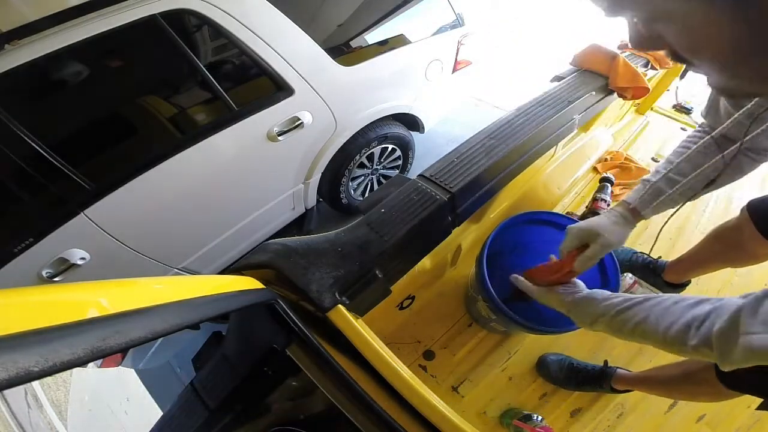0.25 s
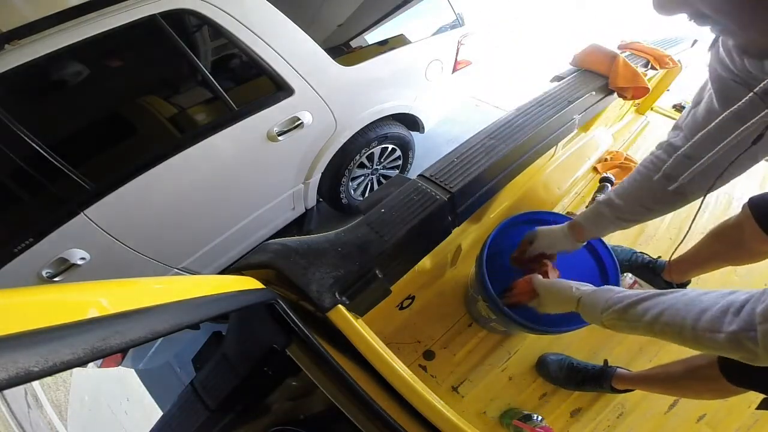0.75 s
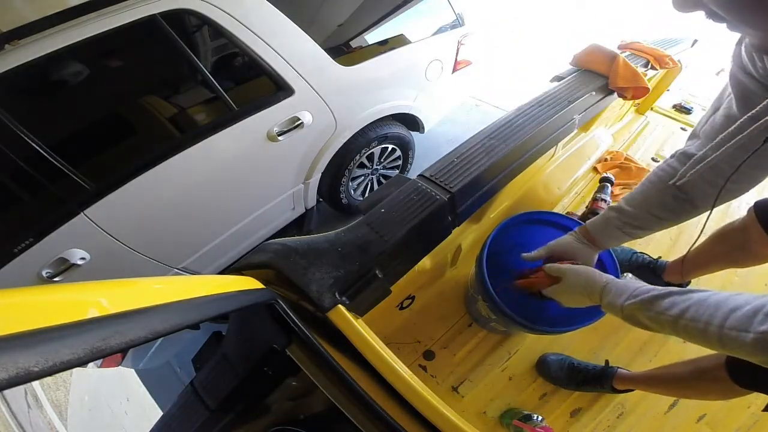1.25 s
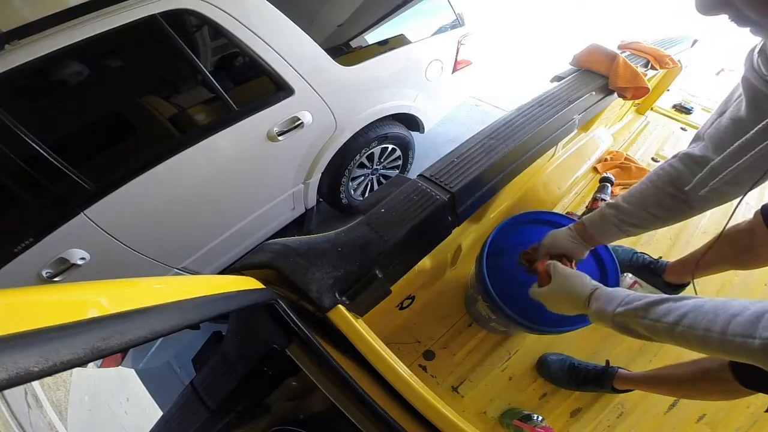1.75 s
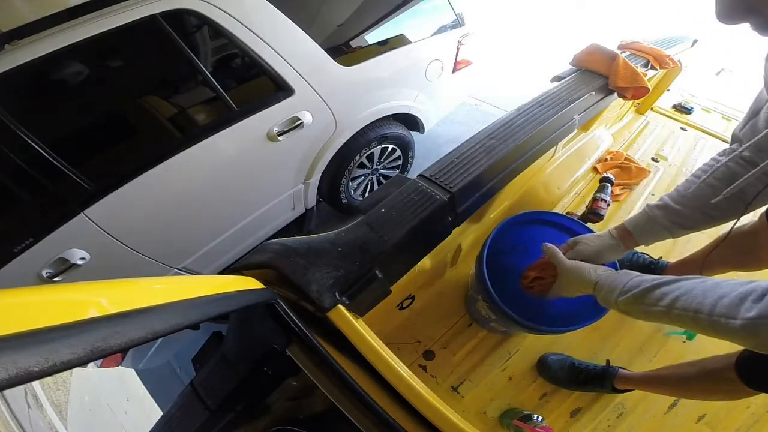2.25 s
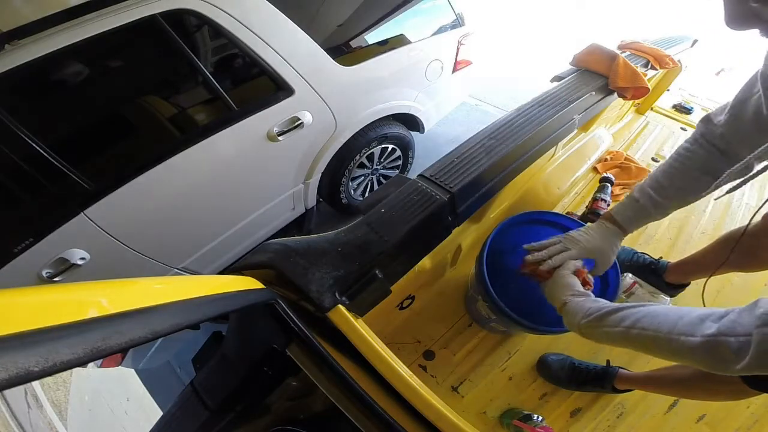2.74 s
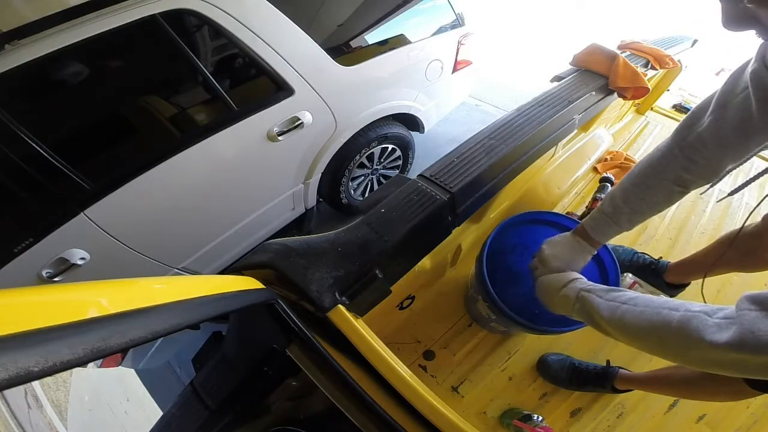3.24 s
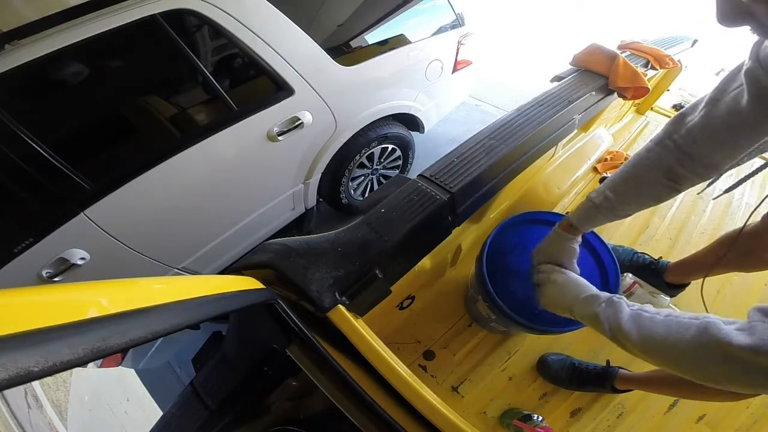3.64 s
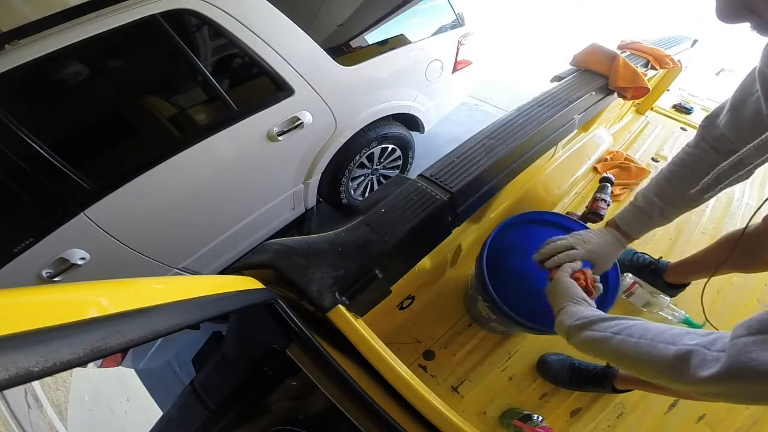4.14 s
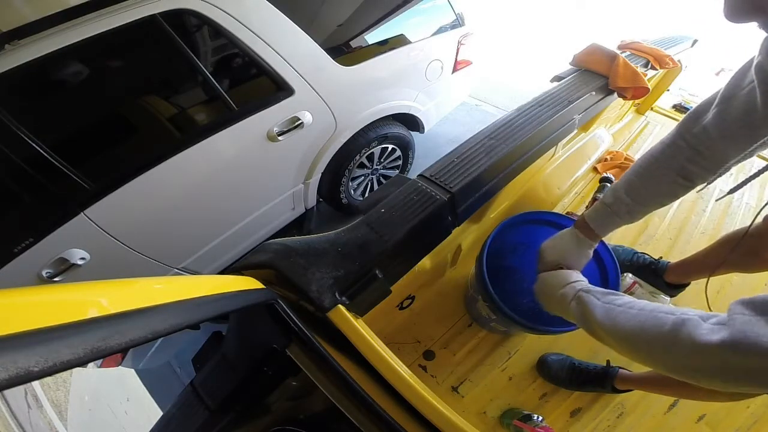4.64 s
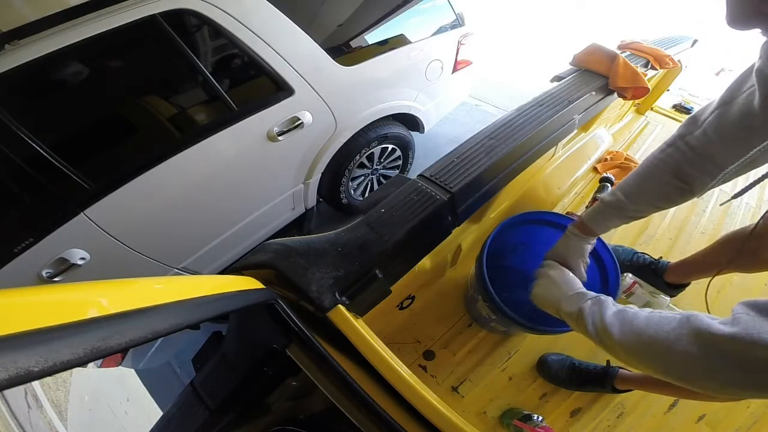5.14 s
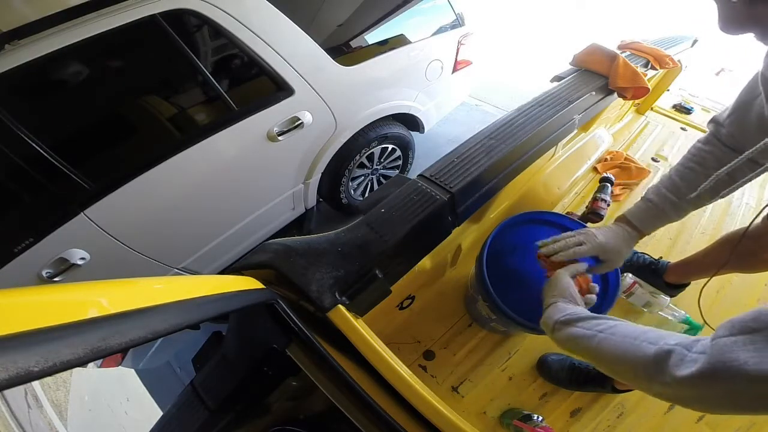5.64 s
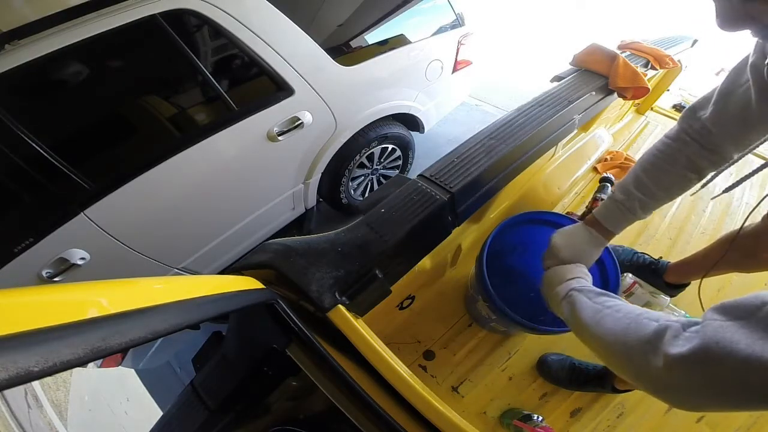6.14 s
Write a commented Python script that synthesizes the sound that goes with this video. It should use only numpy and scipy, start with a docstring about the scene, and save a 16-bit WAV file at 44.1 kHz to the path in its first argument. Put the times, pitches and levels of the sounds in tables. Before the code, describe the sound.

A wet towel is sloshed and wrung over a plastic bucket, with glugging bubbles, spattering drops and dull knocks, between parked cars with a distant engine.

```python
"""Between two parked cars, a wet towel is rinsed and wrung over a plastic bucket.
Air pockets glug as rising, dying sines; drops, slaps and spray are short tones and bursts of noise.
Swarms of small bubbles and hiss make the churn, and resonances of the bucket's air colour the water.
Dull knocks and dry rubs join in, and the cars and walls return a short, dulled tail.
Farther off, two sines make an engine that changes speed, under a hush of shaped noise."""
import sys
import numpy as np
from scipy import signal
from scipy.fft import rfft, irfft
from scipy.io import wavfile
from scipy.ndimage import uniform_filter1d

SR = 44100
rng = np.random.default_rng(int(sys.argv[2]) if len(sys.argv) > 2 else 0)


def wav_out(sig):
    """Save sig, one row per channel (or a flat mono array), as 16-bit PCM at SR to the path in sys.argv[1]."""
    wavfile.write(sys.argv[1], SR, np.round(np.clip(np.atleast_2d(sig).T, -1, 1) * 32767).astype(np.int16))


N = 281799   # length in samples

# Spectrum of water trickling off the towel. Each row: frequency in Hz, relative density in dB per Hz.
TRICKLE_SPECTRUM = [(1300, -8), (1600, -13.5), (2120, 5.5), (2970, 3), (3300, 8.5), (3910, -36),
                    (5200, -16)]
# Spectrum of fizz and fine spray. Each row: frequency in Hz, relative density in dB per Hz.
FIZZ_SPECTRUM = [(3000, -1), (3800, 0), (4720, -3.5), (5400, -2), (6250, -4.5), (8580, -15), (9420, -25.5),
                 (12300, -24), (14000, -70), (15400, -50)]

HUSH_DB = -57   # rms of the part above 130 Hz
YARD_T60_S, YARD_DB = 0.31, -12.5   # decay of the reflections; their level against the water
CUTOFF_HZ = 15600
THIN_HZ, THIN_WAVER_HZ = 2880, 6.6   # centre; spread of the pitch
RUB_RISE_DB_PER_S, RUB_FALL_DB_PER_S = 210, 140
KNOCK_HZ, KNOCK_T60_S = 142, 0.056
HOLLOW_WIDTH_HZ = 36   # of each of two resonances in a row
HOLLOW_RISE_DB_PER_S, HOLLOW_FALL_DB_PER_S = 400, 110
SLAP_T60_S, SLAP_TOP_HZ = 0.086, 2500
FIZZ_DB, FIZZ_FOLLOWS = -54, 0.8   # setting at a trickle of -50 dB; share of the trickle's swing in dB
SURGE_RISE_DB_PER_S, SURGE_FALL_DB_PER_S = 173, 102
HEAVE_REST_DB = -61.5   # the water's mass between surges
SNAP_T60_S = 0.032   # crack
SNAP_TAIL_T60_S, SNAP_TAIL_DB = 0.33, -10   # mist settling; its start against the crack
SNAP_WIDTH_HZ, SNAP_AIR_DB = 1150, -17   # coloured band; broad hiss against it
SNAP_BELOW_PEAK_DB = -8.5   # mean level of the crack's coloured band against the listed peak
SPLASH_DB = -9.5   # broad splash around each drop, against its peak setting
GULP_T60_S, GULP_RISE_OCT = 0.056, 2
TEAR_HZ, GLUG_ROUGH = 190, 0.24   # how fast a ragged pocket flutters; share of flutter 0-1
GLUG_T60_S, GLUG_RISE_OCT = 0.069, 0.1   # ring of a pocket at 800 Hz; every pocket climbs a little
GLUG_LONGER = 0.54   # large, low pockets ring longer: t60 goes with pitch to minus this power


def from_db(db):
    """Decibels to gain."""
    return 10 ** (np.asarray(db) / 20)


def rms_one(x):
    """Scale to unit power."""
    return x / np.sqrt(np.mean(x ** 2) + 1e-20)


def in_time(rows):
    """Columns of a curve table, one value a sample."""
    s, *columns = np.transpose(rows)
    return [np.interp(np.arange(N) / SR, s, column) for column in columns]


def at_hz(points, hz):
    """Read a spectrum on a log-frequency axis."""
    points = np.array(points)
    return np.interp(np.log(hz), np.log(points[:, 0]), points[:, 1])


def drift(rate_hz):
    """Slow chance with spread 1: low-passed noise drawn every 40 samples."""
    r = np.exp(-80 * np.pi * rate_hz / SR)
    steps = rng.standard_normal(N // 40 + 2002)
    slow = signal.lfilter([1], [1, -2 * r, r * r], steps)[2000:]   # skip the filter's start
    return np.interp(np.arange(N) / 40, np.arange(len(slow)), rms_one(slow))


def shaped_noise(spectrum):
    """White noise given a spectrum, silent outside it."""
    hz = np.fft.rfftfreq(N, 1 / SR) + 1
    inside = (hz > spectrum[0][0]) & (hz < spectrum[-1][0])
    white = rfft(rng.standard_normal(N))
    return irfft(white * from_db(at_hz(spectrum, hz)) * inside, N)


def band_pass(x, low_hz, high_hz, order):
    """Keep the band between two frequencies."""
    sos = signal.butter(order, [low_hz, high_hz], "band", fs=SR, output="sos")
    return signal.sosfilt(sos, x)


def resonance(x, hz, width_hz):
    """Two-pole peak with gain close to 1 on top."""
    r = np.exp(-np.pi * width_hz / SR)
    zeros = np.array([1, 0, -1]) * (1 - r * r) / 2
    poles = [1, -2 * r * np.cos(2 * np.pi * hz / SR), r * r]
    return signal.lfilter(zeros, poles, x)


def narrow_noise(hz, width_hz):
    """Noise twice through one resonance; rms 1."""
    once = resonance(rng.standard_normal(N), hz, width_hz)
    return rms_one(resonance(once, hz, width_hz))


def add(out, s, sound):
    """Mix a short sound in at a time."""
    i = int(s * SR)
    out[i:i + len(sound)] += sound[:N - i]


def swells(s, peak_db, rise_db_per_s, fall_db_per_s):
    """Gain that climbs to each peak and falls away from it."""
    since = np.arange(N) / SR - np.array(s)[:, None]
    slope_db = np.minimum(rise_db_per_s * since, -fall_db_per_s * since)
    return from_db(np.array(peak_db)[:, None] + slope_db).sum(axis=0)


def bubble(hz, t60, rise_oct, attack_s):
    """A dying sine; its pitch climbs through the first half as the bubble nears the surface."""
    t60 = np.clip(t60, .008, .5)
    t = np.arange(int(t60 * SR)) / SR
    pitch_hz = hz * 2 ** (rise_oct * np.minimum(2 * t / t60, 1))
    phase = 2 * np.pi * np.cumsum(pitch_hz) / SR
    return np.sin(phase) * from_db(-60 * t / t60) * (1 - np.exp(-t / attack_s))


def swarm(spectrum, per_s, cycles, spread_db, clump_db, count):
    """Random small bubbles in clumps, dealt over the pitches of a spectrum; rms 1."""
    pitches = np.geomspace(spectrum[0][0], spectrum[-1][0], count)
    clumps = from_db(clump_db * drift(13))
    at = np.nonzero(rng.random(N) < per_s * clumps / SR)[0]
    sizes = from_db(spread_db * np.minimum(rng.exponential(1, N), 3)) * rng.choice([-1, 1], N)
    dealt, out = rng.integers(0, count, N), 0
    for k, hz in enumerate(pitches):
        clicks = np.full(N, 1e-18)
        mine = at[dealt[at] == k]
        clicks[mine] = sizes[mine]
        ring = bubble(hz, cycles / hz, rise_oct=0.402, attack_s=0.15 / hz) * hz
        out = out + from_db(at_hz(spectrum, hz)) * signal.fftconvolve(clicks, ring)[:N]
    slow = np.sqrt(uniform_filter1d(out ** 2, int(.2 * SR)) + 1e-12)
    return rms_one(out / slow)   # even out the slow level; the churn sets it


def patter(per_s, spread_db, decay_s):
    """Level of many small drops landing at random: each jumps up and dies quickly; rms 1."""
    sizes = from_db(spread_db * np.minimum(rng.exponential(1, N), 3))
    drops = (rng.random(N) < per_s / SR) * sizes
    r = np.exp(-1 / (decay_s * SR))
    dying = signal.lfilter([1], [1, -r], drops + 1e-18)
    return rms_one(signal.lfilter([.05], [1, -.95], dying))   # soften each onset


def hush():
    """Steady outdoor air and far traffic: shaped noise, levelled by its part above the rumble."""
    # Each row: frequency in Hz, relative density in dB per Hz.
    air_spectrum = [(12, -35), (20, -1), (106, 3.7), (129, -4.5), (152, 1), (213, -6.5), (665, -18),
                    (1010, -19.5), (1530, -21.5), (2990, -28.5), (3940, -29.5), (7500, -25.5),
                    (8000, -31.5), (12300, -39), (13400, -45), (15400, -39)]
    air = shaped_noise(air_spectrum)
    above = signal.sosfilt(signal.butter(4, 130, "high", fs=SR, output="sos"), air)
    return from_db(HUSH_DB + 0.5 * drift(0.92)) * air / np.std(above)


def engine():
    """Two low orders of the firing cycle carry this far; their levels waver."""
    # Engine speed. Each row: time in seconds, cycle rate in Hz.
    engine_speed = [(0, 17.5), (1.6, 17.5), (1.85, 18.6), (2.05, 20.6), (2.25, 22.1), (2.7, 21.6),
                    (3.2, 20.9), (3.6, 21.2), (6.39, 21)]
    # Loudness before the waver. Each row: time in seconds, rms of the fifth and fourth orders in dB.
    order_levels = [(0, -59.5, -52), (1.5, -56, -57), (1.85, -47.5, -53.5), (2.3, -53.5, -49.5),
                    (2.8, -53.5, -55.5), (3.2, -51, -51.5), (3.8, -51, -75), (5, -51, -53),
                    (6.39, -52, -68)]
    fifth_db, fourth_db = in_time(order_levels)
    turn = 2 * np.pi * np.cumsum(in_time(engine_speed)[0]) / SR
    fifth = from_db(fifth_db + 1.6 * drift(5)) * np.sin(turn * 5)
    fourth = from_db(fourth_db + 1.5 * drift(4)) * np.sin(turn * 4)
    return np.sqrt(2) * (fifth + fourth)   # sines of rms 1


def yard(x):
    """Reflections from car sides and walls: a dense, dulled, dying tail."""
    t = np.arange(int(.5 * SR)) / SR
    tail = rng.standard_normal(len(t)) * from_db(-60 * t / YARD_T60_S) * (t > .006)
    tail = signal.lfilter([.45], [1, -.55], tail)
    return signal.fftconvolve(x, tail / np.sqrt(np.sum(tail ** 2)))[:N]


def thin_tone():
    """A faint, narrow, slightly wavering tone that fades in and out."""
    # Each row: time in seconds, rms level in dB.
    tone_fade = [(5.6, -88), (5.64, -69), (5.84, -70), (5.9, -88)]
    level_db, = in_time(tone_fade)
    phase = 2 * np.pi * np.cumsum(THIN_HZ + THIN_WAVER_HZ * drift(9.8)) / SR
    return np.sqrt(2) * from_db(level_db) * np.sin(phase)


def rub():
    """Dry rubs of cloth and gloves: grainy friction noise in the trickle's colour."""
    # Each row: hardest grip in seconds, level there in dB.
    grips = [(4.3, -53.5), (5.85, -66), (6.01, -68), (6.07, -56), (6.15, -65)]
    grain = 0.5 + 0.72 * patter(per_s=120, spread_db=-1.0, decay_s=0.0068)
    friction = rms_one(grain * shaped_noise(TRICKLE_SPECTRUM))
    return swells(*np.transpose(grips), RUB_RISE_DB_PER_S, RUB_FALL_DB_PER_S) * friction


def knocks():
    """Dull knocks on the bucket wall: a low, short thud at a steady pitch."""
    # Each row: start in seconds, level in dB.
    wall_hits = [(0.159, -38), (3.342, -27.5)]
    out = np.zeros(N)
    for s, peak_db in wall_hits:
        add(out, s, from_db(peak_db) * bubble(KNOCK_HZ, KNOCK_T60_S, 0, attack_s=0.0027))
    return out


def hollow():
    """The settling water keeps a low air mode sounding, at a pitch that shifts from swell to swell."""
    # Each row: peak in seconds, level in dB, pitch in Hz.
    hum_swells = [(2.46, -42, 483), (2.602, -43.5, 571), (2.72, -55, 579), (2.85, -52.5, 525),
                  (2.92, -52.5, 445)]
    out = np.zeros(N)
    for s, db, hz in hum_swells:
        gain = swells([s], [db], HOLLOW_RISE_DB_PER_S, HOLLOW_FALL_DB_PER_S)
        out += gain * narrow_noise(hz, HOLLOW_WIDTH_HZ)
    return out


def slaps():
    """Cloth or hand lands flat on the water: a short burst of noise without deep bass or treble."""
    # Each row: start in seconds, level in dB.
    flat_hits = [(0.188, -32.5), (0.426, -30), (1.217, -44), (1.252, -35), (1.873, -33), (2.6, -43),
                 (6.295, -45.5)]
    out = np.zeros(N)
    bursts = rng.standard_normal((len(flat_hits), int(.1 * SR)))
    bursts = band_pass(bursts, 300, SLAP_TOP_HZ, order=2)
    fade = from_db(-60 * np.arange(bursts.shape[1]) / SR / SLAP_T60_S)
    for (s, peak_db), burst in zip(flat_hits, bursts):
        add(out, s, from_db(peak_db) * fade * rms_one(burst))
    return out


def air_modes(x):
    """The resonances of the air above the water, summed with alternating sign."""
    # Each row: frequency in Hz, width in Hz, gain in dB.
    modes = [(393, 37, -5), (591, 17, -11.5), (775, 67, -10.5), (979, 48, -4.5), (1220, 320, -8.5),
             (1940, 73, -3), (2500, 27, -4), (3280, 50, -35)]
    return sum((-1) ** k * from_db(db) * resonance(x, hz, width_hz)
               for k, (hz, width_hz, db) in enumerate(modes))


def spatter(noise):
    """Fine drops differ in size, so each part of the treble patters on its own."""
    edges = np.geomspace(3000, 15000, 5)
    return sum(patter(per_s=78, spread_db=6.0, decay_s=0.011) * band_pass(noise, low, high, order=2)
               for low, high in zip(edges, edges[1:]))


def churn():
    """Slosh of large bubbles, trickle of small ones and fizz, each over wet hiss; the mass heaves below."""
    # Large bubbles. Each row: frequency in Hz, relative density in dB per Hz.
    slosh_spectrum = [(230, -40), (393, -10), (560, 1), (765, 2.5), (1100, -3.5), (1470, -19), (1900, -7)]
    # How hard the water is stirred. Each row: time in seconds, slosh setting in dB.
    stirring = [(0, -33.5), (.12, -53), (.8, -43.5), (1.16, -46), (1.55, -52), (1.72, -48.5), (2.01, -49.5),
                (2.15, -56.5), (2.3, -52.5), (2.6, -49.5), (3.02, -53.5), (3.22, -46), (3.72, -40.5),
                (3.95, -53), (4.57, -56.5), (4.75, -44.5), (5.15, -45.5), (5.39, -53), (5.55, -58.5),
                (6.39, -53.5)]
    # Water running off the towel. Each row: time in seconds, trickle setting in dB.
    towel_runoff = [(0, -48), (.3, -52.5), (.55, -53.5), (.65, -46), (.98, -49.5), (1.24, -55.5),
                    (1.6, -55.5), (1.72, -48), (2.01, -50.5), (2.15, -60), (2.26, -53), (2.42, -55),
                    (2.74, -67), (3.02, -57.5), (3.14, -42.5), (3.72, -45), (3.95, -61.5), (4.09, -71),
                    (4.56, -67.5), (4.68, -42.5), (5.15, -45), (5.55, -70), (6.39, -66.5)]
    # A mass of water thrown about or squeezed out at once.
    # Each row: peak in seconds, added slosh in dB, added fizz in dB, added heave in dB.
    surges = [(.19, -42.5, -93, -42), (.44, -46, -53.5, -62), (0.901, -37, -84, -40), (1.24, -74, -63, -50),
              (1.93, -37.5, -55.5, -45.5), (2.33, -41, -60, -64), (3.24, -46, -44.5, -55),
              (3.35, -38, -83, -44), (3.52, -51, -78, -42), (4.81, -44, -54, -57), (5.061, -37, -70, -41.5)]
    (slosh_db,), (trickle_db,) = in_time(stirring), in_time(towel_runoff)
    fizz_db = FIZZ_DB + FIZZ_FOLLOWS * (trickle_db + 50)
    s, *peaks = np.transpose(surges)
    slosh_up, fizz_up, heave_up = [
        swells(s, db, SURGE_RISE_DB_PER_S, SURGE_FALL_DB_PER_S) for db in peaks]

    slosh = swarm(slosh_spectrum, per_s=450, cycles=47.5, spread_db=4.5, clump_db=2.5, count=24)
    trickle = swarm(TRICKLE_SPECTRUM, per_s=400, cycles=47, spread_db=3.0, clump_db=6.0, count=18)
    fizz_clump_db = 6 * np.clip((trickle_db + 64) / 15, .2, 1)
    fizz = swarm(FIZZ_SPECTRUM, per_s=1500, cycles=20, spread_db=0.5, clump_db=fizz_clump_db, count=16)

    bubbly = np.clip((slosh_db + 57.5) / 10.6, .15, 1)   # calm water traps little air
    wash = rms_one(air_modes(shaped_noise(slosh_spectrum)))   # moving water keeps the air humming
    wash_gain = 0.39 * from_db(4.96 * bubbly * drift(10.6))
    drops = patter(per_s=50, spread_db=5.5, decay_s=0.006)
    hiss = rms_one(shaped_noise(TRICKLE_SPECTRUM))
    mist = rms_one(shaped_noise(FIZZ_SPECTRUM))
    heave = resonance(rng.standard_normal(N), hz=150, width_hz=640)
    heave = rms_one(resonance(heave, hz=141, width_hz=140))

    stirred = (from_db(slosh_db) + slosh_up) * (bubbly * slosh + wash_gain * wash)
    running = from_db(trickle_db) * (trickle + (0.12 + 0.99 * drops) * hiss)
    fizzing = fizz + (0.051 + 0.44 * drops) * mist + 1.08 * spatter(mist)
    fizzing = (from_db(fizz_db) + fizz_up) * fizzing
    return stirred + running + fizzing + (from_db(HEAVE_REST_DB) + heave_up) * heave


def snaps():
    """A sheet of water bursts into spray: a coloured treble band over broad hiss, with a softer tail."""
    # Each row: start in seconds, peak setting in dB, strongest frequency in Hz.
    bursting_sheets = [(0.3681, -38, 6010), (0.6494, -34, 6200), (1.2552, -37.5, 6900),
                       (1.4154, -43.5, 5730), (1.7673, -37.5, 7090), (1.799, -38, 5540),
                       (1.867, -30.5, 5010), (2.1824, -39, 5730), (2.3025, -33, 5400), (2.322, -31.5, 8800),
                       (2.9118, -46, 5740), (3.1276, -34, 5230), (3.1842, -33, 5340), (3.231, -26, 6030),
                       (3.396, -36, 5530), (3.5694, -37, 5100), (3.7908, -36.5, 7120), (3.843, -33.5, 5680),
                       (4.5977, -40, 6030), (4.891, -43, 5580), (5.2889, -40, 5610)]
    out = np.zeros(N)
    bursts = rng.standard_normal((len(bursting_sheets), int(.2 * SR)))
    t = np.arange(bursts.shape[1]) / SR
    fade = from_db(-60 * t / SNAP_T60_S) + from_db(SNAP_TAIL_DB - 60 * t / SNAP_TAIL_T60_S)
    airs = band_pass(bursts, 5000, 13300, order=3)
    for (s, peak_db, hz), air in zip(bursting_sheets, airs):
        coloured = rms_one(resonance(air, hz, SNAP_WIDTH_HZ))
        burst = coloured + from_db(SNAP_AIR_DB) * rms_one(air)
        add(out, s, from_db(peak_db + SNAP_BELOW_PEAK_DB) * fade * burst)
    return out


def splats():
    """Each drop: a small bubble in noise around its pitch, a broad splash, and fine spray above."""
    # Drops hitting the surface. Each row: start in seconds, peak setting in dB, bubble pitch in Hz,
    # bubble t60 in seconds, spray setting in dB.
    falling_drops = [(0.1852, -22, 2150, 0.018, -56), (0.3336, -35, 3140, 0.15, -57),
                     (0.4249, -33.5, 1986, 0.17, -39), (0.5662, -33, 2190, 0.033, -58),
                     (0.637, -31.5, 3360, 0.065, -42.5), (0.6783, -26.5, 3070, 0.089, -57),
                     (0.99, -28, 3400, 0.066, -59), (1.0788, -26.5, 5000, 0.027, -19.5),
                     (1.2189, -29, 2860, 0.019, -56), (1.4705, -35.5, 2184, 0.077, -62),
                     (1.621, -34, 1960, 0.026, -59), (1.6432, -27, 1790, 0.036, -64),
                     (1.6675, -28, 2150, 0.032, -56), (1.705, -27, 3520, 0.022, -36),
                     (1.732, -28.5, 2920, 0.049, -60), (1.803, -33, 2780, 0.034, -44),
                     (1.9032, -30.5, 3070, 0.069, -35.5), (2.2045, -30.5, 3350, 0.017, -60),
                     (2.2302, -34, 3200, 0.11, -46.5), (2.3032, -30.5, 3270, 0.094, -57),
                     (2.32, -31, 3270, 0.047, -35.5), (2.383, -32, 2590, 0.043, -37),
                     (2.483, -39.5, 3450, 0.091, -69), (2.517, -29, 3310, 0.043, -42),
                     (2.745, -42.5, 5650, 0.046, -57), (2.9116, -32.5, 5640, 0.054, -36.5),
                     (3.0624, -27, 2030, 0.035, -36), (3.085, -23.5, 1950, 0.022, -64),
                     (3.132, -24.5, 2660, 0.069, -30), (3.232, -31, 3320, 0.038, -43),
                     (3.2963, -17.5, 2550, 0.021, -53), (3.3207, -27.5, 2980, 0.069, -66),
                     (3.3414, -25.5, 2450, 0.039, -54), (3.3728, -30, 2390, 0.053, -41),
                     (3.4013, -24, 3160, 0.047, -28.5), (3.436, -20, 3280, 0.029, -26.5),
                     (3.505, -19.5, 3210, 0.047, -61), (3.532, -20.5, 3120, 0.028, -31.5),
                     (3.5776, -31.5, 2140, 0.12, -40.5), (3.647, -27, 3720, 0.027, -40),
                     (3.7005, -25, 2164, 0.044, -41), (3.745, -31, 2480, 0.041, -55),
                     (3.7797, -40.5, 2230, 0.14, -54), (4.1012, -37.5, 2075, 0.044, -51),
                     (4.629, -35.5, 3280, 0.087, -47), (4.649, -33, 2500, 0.035, -49),
                     (4.6683, -34, 3520, 0.041, -29), (4.724, -22.5, 2440, 0.034, -30),
                     (4.749, -26, 3330, 0.031, -50), (4.7775, -32, 3400, 0.063, -53),
                     (4.793, -26, 3380, 0.036, -37), (4.8177, -29, 2060, 0.047, -43),
                     (4.8375, -21, 3280, 0.032, -52), (4.9145, -44, 3280, 0.049, -33),
                     (4.9404, -26.5, 1800, 0.052, -53), (4.956, -26.5, 1810, 0.04, -45),
                     (5.007, -34, 3460, 0.059, -37), (5.065, -28, 3280, 0.075, -45),
                     (5.0865, -35, 3420, 0.093, -32.5), (5.1254, -23.5, 3280, 0.027, -37),
                     (5.171, -19, 2450, 0.042, -24), (5.244, -30, 2980, 0.04, -39.5),
                     (5.2595, -22, 2530, 0.02, -34), (5.278, -29, 2860, 0.056, -43),
                     (5.495, -48, 5400, 0.034, -46), (5.604, -55, 3500, 0.03, -51),
                     (6.296, -50, 2500, 0.12, -48.5), (6.38, -45, 3300, 0.043, -44)]
    out, splash_gate = np.zeros((2, N))
    mist = rms_one(shaped_noise(FIZZ_SPECTRUM))
    tints_hz = rng.uniform(3700, 7400, len(falling_drops))   # every spray has its own colour
    puffs = rng.standard_normal((len(falling_drops), int(.12 * SR)))
    t = np.arange(puffs.shape[1]) / SR
    for (s, peak_db, hz, t60, spray_db), puff, tint_hz in zip(falling_drops, puffs, tints_hz):
        dying = from_db(-60 * t / np.clip(t60, .01, .2))
        fade = dying * (1 - np.exp(-t / 0.0034))
        add(out, s, from_db(peak_db - 2.0) * bubble(hz, t60, rise_oct=0.183, attack_s=0.00031))
        add(out, s, from_db(peak_db - 1.5) * fade * rms_one(resonance(puff, hz, width_hz=246)))
        add(splash_gate, s, from_db(peak_db + SPLASH_DB) * dying)
        spray = np.roll(mist, -int(s * SR))[:len(t)]
        spray = resonance(resonance(spray, tint_hz, width_hz=2400), tint_hz, width_hz=3800)
        add(out, s, from_db(spray_db + 9.5) * fade * spray)
    return out + splash_gate * rms_one(shaped_noise(TRICKLE_SPECTRUM))


def gulps():
    """Water folds over a hollow, which closes quickly, so its pitch sweeps up."""
    # Each row: start in seconds, level in dB, starting pitch in Hz.
    folds = [(.474, -26, 400), (0.705, -17.5, 475), (0.882, -23, 312), (1.873, -24, 333),
             (1.889, -19.5, 335), (1.913, -18.5, 361), (2.003, -27.5, 303), (2.212, -36, 960),
             (5.003, -14, 335), (5.047, -21, 380)]
    out = np.zeros(N)
    for s, peak_db, hz in folds:
        add(out, s, from_db(peak_db) * bubble(hz, GULP_T60_S, GULP_RISE_OCT, attack_s=0.0045))
    return out


def glugs():
    """Each closing air pocket rings at its own pitch and flutters, which widens it into a band."""
    # Each row: start in seconds, strength in dB, starting pitch in Hz, attack in ms.
    pockets = [(0.022, -23, 710, 4), (0.058, -19.5, 1006, 1.8), (0.062, -24, 752, 2.6),
               (0.141, -20, 890, 2.8), (0.187, -19.5, 930, 1.2), (0.322, -29, 980, 1),
               (0.388, -14, 1037, 2.3), (0.426, -22, 1016, 0.66), (0.436, -22, 701, 2.9),
               (0.479, -13.5, 797, 11), (0.555, -29, 598, 8.9), (0.646, -16.5, 775, 1.2),
               (0.707, -17.5, 724, 3.6), (0.769, -28, 1220, .6), (0.886, -25.5, 730, 1.1),
               (0.921, -10.5, 575, 0.6), (0.965, -22, 557, 0.77), (1.043, -15.5, 634, 1.5),
               (1.066, -13.5, 710, 1.9), (1.1, -26, 765, 1), (1.22, -28.5, 964, 0.37),
               (1.395, -25.5, 893, 0.69), (1.408, -27.5, 1070, 0.41), (1.452, -31, 1316, 0.79),
               (1.697, -27.5, 755, 1.5), (1.731, -27.5, 1170, 0.99), (1.779, -30.5, 744, 1.1),
               (1.804, -24.5, 1120, 0.91), (1.856, -23, 1140, 1.5), (1.873, -18.5, 663, 1.4),
               (1.892, -17.5, 735, 1.3), (1.908, -15.5, 798, 1.6), (1.929, -20.5, 905, 0.7),
               (2.18, -12, 910, 2), (2.286, -18, 900, 1.2), (2.321, -21.5, 664, 0.71),
               (2.334, -21.5, 775, 1.2), (2.366, -26, 741, 1.2), (2.419, -19, 515, 0.72),
               (2.434, -19, 800, 4.9), (2.515, -30, 753, 12), (2.577, -24.5, 993, 1.3), (2.6, -36, 1546, 1),
               (2.992, -30.5, 1220, 1.2), (3.141, -23.5, 1060, 0.52), (3.172, -22.5, 752, 1.5),
               (3.19, -19.5, 496, 1.1), (3.269, -19.5, 724, 1), (3.315, -18.5, 1243, 1.8),
               (3.339, -26, 371, 0.73), (3.358, -20, 790, 3), (3.377, -19, 802, 1.9), (3.49, -21, 845, 1.8),
               (3.502, -22, 775, 1.6), (3.509, -27, 395, 1.5), (3.597, -21.5, 718, 1.5),
               (3.613, -24, 353, 0.7), (3.622, -23, 786, 0.66), (3.667, -18, 409, 6),
               (3.776, -20.5, 745, 0.83), (3.832, -20, 945, 2.8), (3.844, -24.5, 902, 0.3),
               (4.672, -31, 812, 3), (4.705, -29, 764, 1.1), (4.78, -10, 778, 3.4), (4.785, -20, 430, 1.3),
               (4.823, -19, 775, 1.9), (4.916, -18.5, 455, 1.8), (4.944, -18.5, 393, 1.4),
               (4.979, -14, 862, 0.98), (5.005, -16.5, 537, 1.1), (5.014, -12, 761, 1.9),
               (5.044, -17.5, 710, 1.9), (5.121, -20.5, 1220, 1.7), (5.181, -19, 703, 0.79),
               (5.258, -26, 764, 1.6), (5.28, -31, 720, 1.8), (5.538, -32, 1206, 0.68)]
    out = np.zeros(N)
    tears = rng.standard_normal((len(pockets), SR))
    r = np.exp(-2 * np.pi * TEAR_HZ / SR)
    for (s, peak_db, hz, attack_ms), tear in zip(pockets, tears):
        t60 = GLUG_T60_S * (hz / 800) ** -GLUG_LONGER
        ring = bubble(hz, t60, GLUG_RISE_OCT, attack_s=max(attack_ms, .2) / 1000)
        ragged = rms_one(signal.lfilter([1], [1, -2 * r, r * r], tear))[SR // 2:][:len(ring)]
        add(out, s, from_db(peak_db) * ring * (1 - GLUG_ROUGH + GLUG_ROUGH * ragged))
    return out


def bucket(water):
    """The air above the water rings on after every sound."""
    return 0.84 * water + .5 * air_modes(water)


def scene():
    """Water in the bucket and the small sounds around it, their reflections, and the background."""
    water = bucket(glugs() + gulps() + splats() + snaps() + churn() + slaps())
    near = water + knocks() + hollow() + rub() + thin_tone()
    return (near + from_db(YARD_DB) * yard(near) + engine() + hush())[None]


def record(dry):
    """A steep low-pass takes at least 50 dB off everything above the cutoff."""
    return signal.sosfilt(signal.cheby2(16, 50, CUTOFF_HZ, fs=SR, output="sos"), dry)


dry = scene()
out = record(dry)
wav_out(out)
```